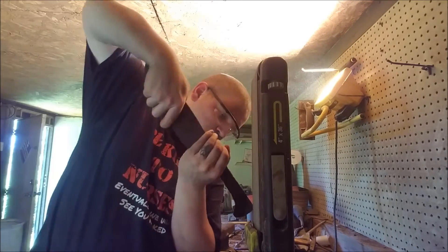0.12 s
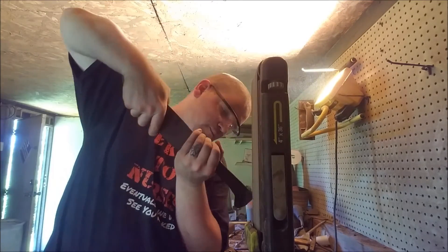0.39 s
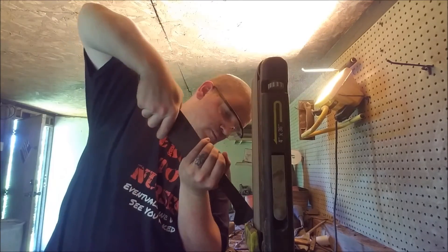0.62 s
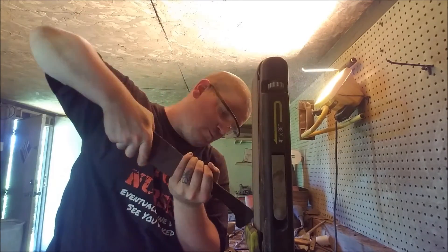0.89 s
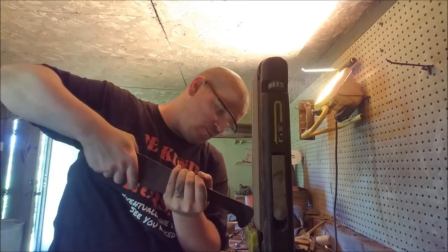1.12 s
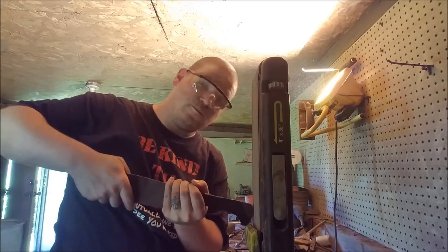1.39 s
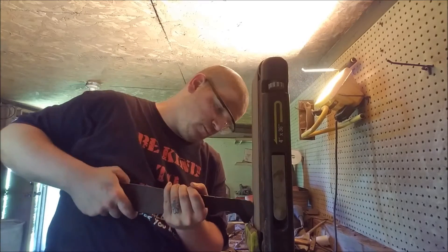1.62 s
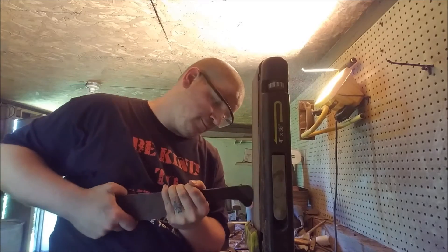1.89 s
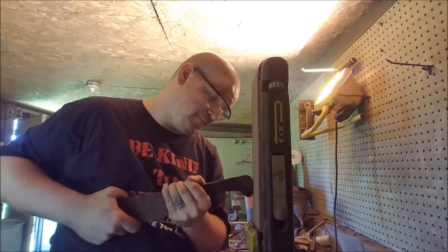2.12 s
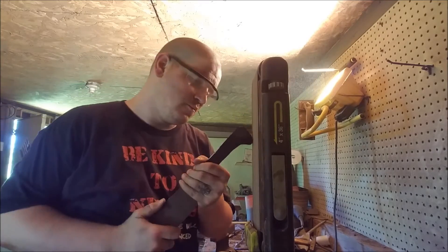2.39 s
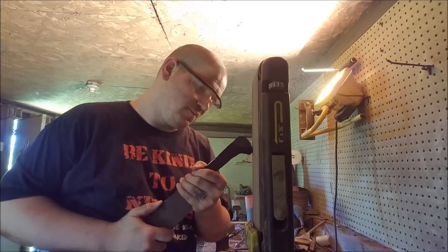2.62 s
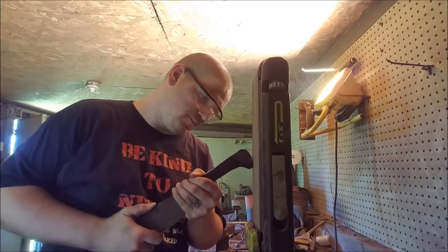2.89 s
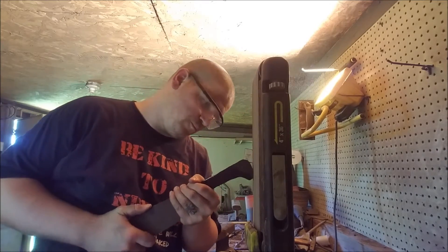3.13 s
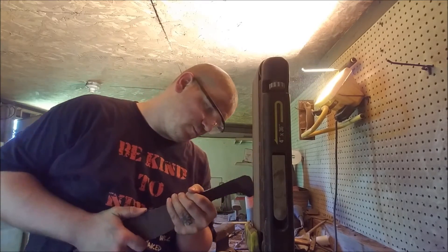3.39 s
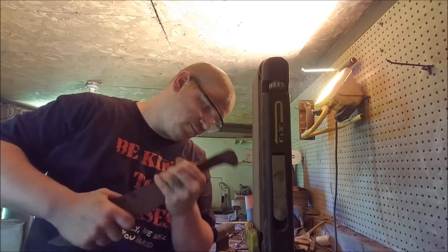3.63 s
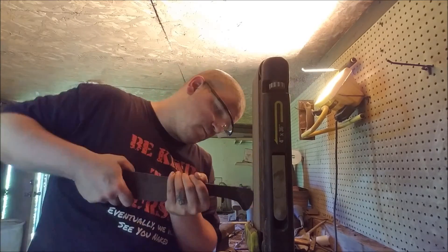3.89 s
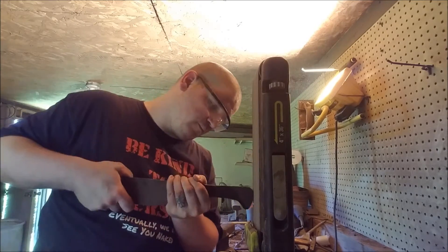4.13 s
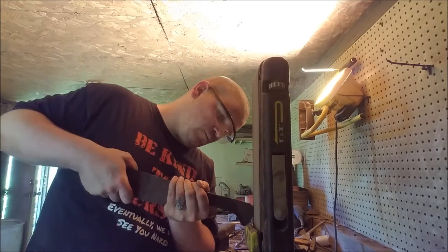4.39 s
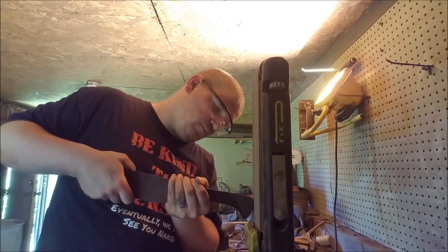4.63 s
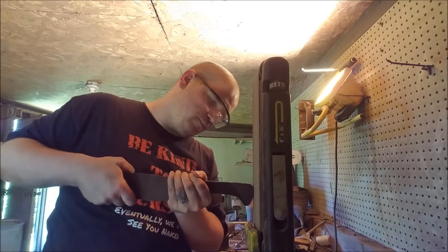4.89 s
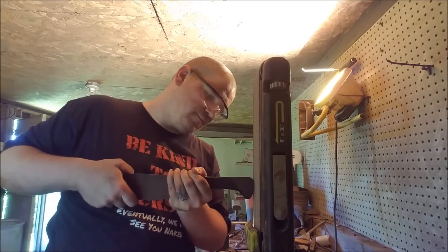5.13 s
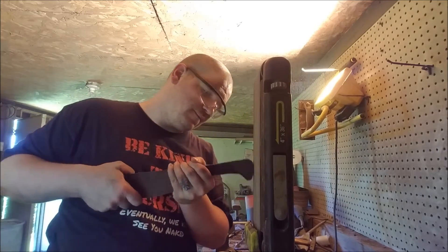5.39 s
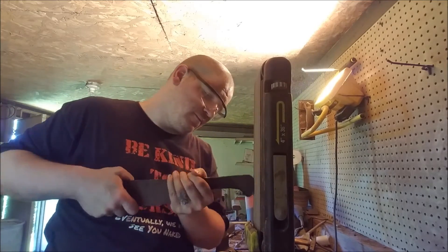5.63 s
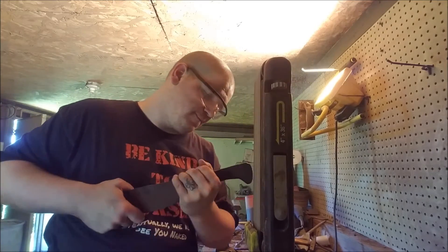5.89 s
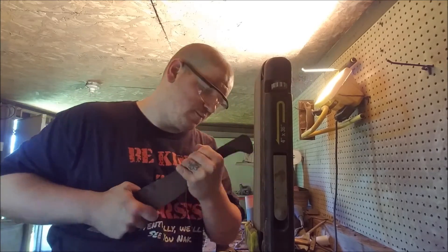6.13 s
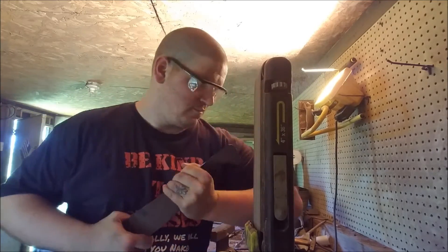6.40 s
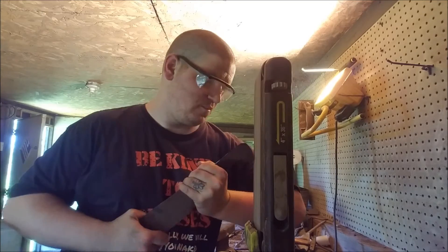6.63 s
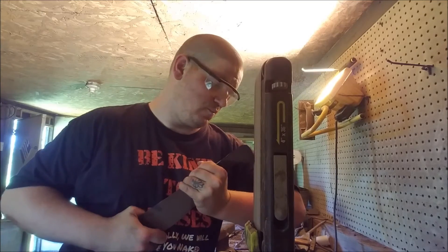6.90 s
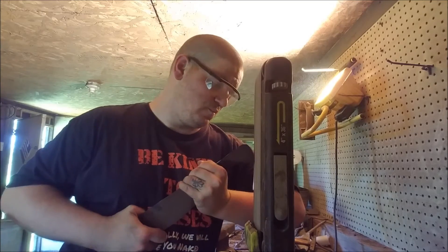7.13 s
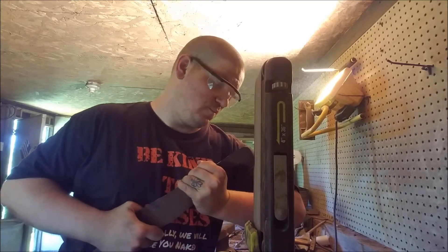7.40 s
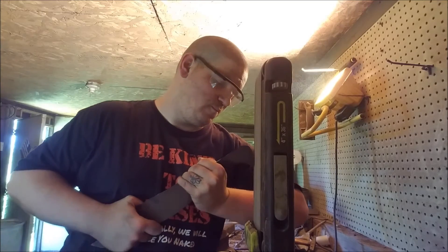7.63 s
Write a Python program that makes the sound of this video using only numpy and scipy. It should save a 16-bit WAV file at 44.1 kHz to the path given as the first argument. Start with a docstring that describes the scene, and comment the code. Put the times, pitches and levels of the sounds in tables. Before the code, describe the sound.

Close stereo pickup in a small, dry workshop: a belt grinder runs throughout with low hum, a steady high whine and a throbbing broadband roar. A steel blade touches briefly, then grinds hard in a long stroke, then lighter and in further passes with little bounces. Each contact brings gritty hiss, sizzle and metallic ringing; the motor sags, then swells back when the blade lifts.

```python
"""Blade on a belt grinder

A belt grinder runs in a small workshop while a steel blade is drawn across the belt in strokes.
The motor's hum and whine are sums of sines; the belt's roar is shaped noise that throbs with the wheel.
Grit tears at the steel as random grains and noise, and the blade rings through a bank of resonances.
Load slows the motor; the recorder's gain control lets the machine swell soon after the blade lifts."""
import sys
import numpy as np
from scipy import signal
from scipy.fft import rfft, irfft
from scipy.io import wavfile
from scipy.ndimage import minimum_filter1d

SR = 44100
rng = np.random.default_rng(int(sys.argv[2]) if len(sys.argv) > 2 else 0)


def output_pcm(signal):
    """Save a mono or channel-first signal as 16-bit PCM at the path in sys.argv[1].

    Samples are clipped to [-1, 1] before scaling.
    """
    pcm = np.clip(np.atleast_2d(signal).T, -1, 1) * 32767
    wavfile.write(sys.argv[1], SR, np.round(pcm).astype(np.int16))


def makeup_ratio(level_db):
    """Linear amplitude ratio for a level in decibels (20 dB per factor of ten)."""
    decades = np.asarray(level_db, float) / 20
    return 10 ** decades


N = 342216   # samples


def rms_one(x):
    """Normalisation: scales a signal to unit root mean square."""
    return x / np.sqrt(np.mean(x ** 2) + 1e-20)


def in_time(rows):
    """Linear interpolation: reads the columns of a table at every sample, its first column being t/s."""
    s, *columns = np.transpose(rows)
    return [np.interp(np.arange(N) / SR, s, c) for c in columns]


def lagged(x, seconds, rate=SR):
    """First-order lag: exponential smoothing, run in on the first value."""
    r = np.exp(-1 / (seconds * rate))
    return signal.lfilter([1 - r], [1, -r], x, zi=[r * x[0]])[0]


def drift(corner_hz):
    """Low-passed chance: noise at SR / 20 through two equal one-pole filters, scaled to rms 1."""
    r = np.exp(-40 * np.pi * corner_hz / SR)
    slow = signal.lfilter([1], [1, -2 * r, r * r], rng.standard_normal(N // 20 + 4002))[4000:]
    return np.interp(np.arange(N) / 20, np.arange(len(slow)), rms_one(slow))


def on_grid(points):
    """Logarithmic frequency scale: reads (f/Hz, value) points at every FFT bin."""
    hz = np.maximum(np.fft.rfftfreq(N, 1 / SR), 1)
    f, value = np.transpose(points)
    return np.interp(np.log(hz), np.log(f), value)


def closed(spectrum):
    """Band limitation: gain per FFT bin, sloping down to -60 dB beyond the ends of the table."""
    ends_low, ends_high = (spectrum[0][0] / 2, -60), (SR / 2, -60)
    return makeup_ratio(on_grid([ends_low] + list(spectrum) + [ends_high]))


# phase by which the left port leads the right: f/Hz, lead/rad
PORT_LEAD_PHASE = [(300, 0.24), (2500, 0.36), (3000, 1), (4200, 1.17), (5200, 1.5), (6000, 0.31),
                   (7400, 2.54), (8300, 2.5), (9000, 2.2), (10000, 0.91), (11000, 2.9), (16000, 3.9)]


def late(x):
    """Diffraction: sound bends round the casing and reaches the right port a little after the left."""
    return np.array([x, irfft(rfft(x) * np.exp(-1j * on_grid(PORT_LEAD_PHASE)), N)])


# share of the broad noise common to both ports: f/Hz, share (0-1)
PORT_LIKENESS = [(60, 0.46), (200, 1), (500, 0.47), (1300, 0.81), (2200, 0.48), (4000, 0.28), (8000, 0.093),
                 (14000, 0.39)]


def port_likeness():
    """Spatial coherence: the share of power common to both ports, per FFT bin."""
    return on_grid(PORT_LIKENESS)


def at_ports(source, spectrum, alike):
    """Direct and reverberant field: a part shared by both ports, and reflections that differ in each."""
    walls_t60_s, far_share = 0.099, 0.14
    t = np.arange(SR // 10) / SR
    echoes = rng.standard_normal((2, len(t))) * makeup_ratio(-60 * t / walls_t60_s)
    echoes = rfft(echoes / np.linalg.norm(echoes, axis=1, keepdims=True), N)
    diffuse = rfft(rng.standard_normal((2, N)))   # far walls smear the sound into unrelated noise
    reflected = np.sqrt(1 - far_share) * echoes * rfft(source) + np.sqrt(far_share) * diffuse
    mixed = np.sqrt(alike) * rfft(late(source)) + np.sqrt(1 - alike) * reflected
    return rms_one(irfft(mixed * spectrum, N))


def panned(x, left_db):
    """Intensity stereo: the left is raised by half of left_db and the right lowered by half."""
    return x * makeup_ratio(np.outer([.5, -.5], left_db * np.ones(N)))


# one list per stroke of the blade: t/s, pressure level/dB, place/blade length, drag as loss of whine f/Hz
STROKE_PATHS = [
    [(0.077, -16, -0.03, 4.5), (0.21, -12, -0.06, 13.7), (0.28, -9.5, 0.0065, 14.3),
     (0.35, -11.5, 0.035, 12.6)],
    [(0.52, -12.5, 0.19, 3), (0.63, -6.5, 0.035, 19), (0.81, -5.5, 0.35, 23.2), (1.14, -6.5, 0.38, 29),
     (1.33, -5.5, 0.53, 20.8), (1.44, -8.5, 0.7, 15.5), (1.76, -8.5, 0.65, 19.1), (1.99, -11.5, 0.79, 13.5),
     (2.18, -15, 1.25, 9.2)],
    [(2.425, -18.5, 0.27, 4.3), (2.51, -19, 0.54, 8.9), (2.78, -18.5, 1, 12.1), (2.85, -19.5, 1.15, 10.3),
     (2.9, -16.5, 1.16, 10.9), (3.12, -15, 1.23, 13.4), (3.38, -12, 1.2, 12.7), (3.52, -10.5, 0.72, 10.5)],
    [(4.045, -22.5, 0.92, 3.2), (4.16, -18, 0.82, 6.7), (4.3, -11.5, 0.43, 9.2), (4.58, -12, 0.73, 19.2),
     (4.69, -11, 0.76, 22.7), (5.1, -12, 1.15, 29), (5.19, -10.5, 1.1, 16.6), (5.502, -13, 0.94, 19.2)],
    [(5.6, -18.5, 0.93, 2.94), (5.68, -18.5, 1.16, 3.07), (5.755, -16, 1.14, 3.3)],
    [(6.0, -12.5, 0.83, 5.7), (6.085, -14, 1.17, 5.5)],
    [(6.667, -16, 0.73, 5.6), (6.74, -19.5, 1, 7.8), (6.85, -23.5, 1, 7.2), (7.02, -20.5, 0.89, 9.1),
     (7.11, -22, 1, 9.9), (7.26, -21.5, 0.96, 8.1), (7.53, -19.5, 1, 12.5), (7.66, -18.5, 0.87, 6.2),
     (7.76, -20.5, 1, 3.8)],
]
# the blade bounces on the belt: t/s, duration/s, pressure level/dB
BELT_BOUNCES = [(2.193, 0.013, -17.5), (3.543, 0.021, -12), (3.914, 0.062, -18.5), (3.985, .06, -23.5),
                (5.521, 0.021, -11.5), (5.77, 0.017, -16.5), (5.79, 0.11, -24), (6.102, 0.017, -13.5)]


def contact():
    """Intermittent contact: returns its on-off state, pressure, place and drag at every sample."""
    bounce_place = 0.81
    touches = list(STROKE_PATHS)
    for s, length, db in BELT_BOUNCES:
        touches.append([(s, db, bounce_place, 0), (s + length, db, bounce_place, 0)])
    on, t = np.zeros(N), np.arange(N) / SR
    for touch in touches:
        on[(t >= touch[0][0]) & (t <= touch[-1][0])] = 1
    rows = sorted(tuple(row) for touch in touches for row in touch)
    return on, *in_time(rows)


# the hands lean the blade towards its edge (positive) or its flat (negative): t/s, lean
BLADE_LEAN = [(.08, 0.07), (.24, -0.38), (.55, -0.48), (.72, -0.18), (1.1, -0.53), (1.5, -0.37),
              (2.15, -0.055), (2.45, 2), (2.62, 0.82), (2.75, -0.13), (3.35, -0.72), (3.52, 0.11),
              (4.4, 0.079), (4.65, -0.33), (5.3, -0.1), (5.52, 0.45), (5.75, -0.38), (6.05, 0.64),
              (6.7, .8), (6.95, 0.49), (7.3, 0.022), (7.76, 0.29)]


def fed(place, db, swing_db, waves, best, lean_db=0):
    """Position-dependent excitation: gain follows a wave along the blade, shifted by the lean."""
    wave = np.cos(2 * np.pi * waves * (place - best))
    return makeup_ratio(db + swing_db * wave + lean_db * in_time(BLADE_LEAN)[0])


def load_shake():
    """Forced vibration: how hard the pressed blade shakes belt and frame."""
    on, pressure_db, place, _ = contact()
    return lagged(on, 0.0063) * makeup_ratio(pressure_db) * fed(place, db=-14, swing_db=9, waves=0.52, best=0.98)


def drag_hz():
    """Rotor inertia: the loss of whine frequency follows the drag with a lag."""
    on, _, _, drag = contact()
    return lagged(on * drag, seconds=.03)


FREE_WHINE_HZ, WHINE_PER_TURN = 1260, 31.4   # unloaded whine; whine cycles per turn of the wheel


def wheel_turns():
    """Integrated speed: turns of the drive wheel since the start."""
    return np.cumsum((FREE_WHINE_HZ - drag_hz()) / WHINE_PER_TURN) / SR


def wheel_throb(depth):
    """Eccentric rotation: a slightly out-of-round wheel presses the belt harder once per turn."""
    angle = 2 * np.pi * wheel_turns()
    return 1 + depth * sum(np.cos(k * (angle + 0.317 * k)) for k in range(1, 12)) / 3


def per_turn(fresh, share, memory):
    """Cyclic repetition: the wheel's surface pattern comes round again, slowly changing, in fresh noise."""
    turns, size = wheel_turns(), 1100   # pattern points per turn
    chance = rng.standard_normal((int(turns[-1]) + 21, size))
    pattern = signal.lfilter([1], [1, -memory], chance, axis=0)[20:]   # one row per turn
    repeated = pattern.ravel()[(turns * size).astype(int)]
    return np.sqrt(share) * rms_one(repeated) + np.sqrt(1 - share) * rms_one(fresh)


# how much of the rasp returns with each turn of the wheel: t/s, share (0-1)
TURN_REPEAT = [(0, 0.06), (.6, 0.57), (1.15, 1), (1.5, 0.27), (2.8, 0.29), (4.3, 0.05), (4.85, 1),
               (5.2, 0.36), (7.76, 0.13)]


def repeat_share():
    """Periodicity: the share of the rasp that returns each turn, which also scales the frame's tones."""
    return in_time(TURN_REPEAT)[0]


def tone(hz, waver_db):
    """Phase accumulation: a sine whose level wavers about rms 1 with a spread of waver_db."""
    phase = 2 * np.pi * np.cumsum(hz * np.ones(N)) / SR + rng.uniform(0, 2 * np.pi)
    return np.sqrt(2) * np.sin(phase) * makeup_ratio(waver_db * drift(10.2))


# steady tones of the hum: f/Hz, level/dB re hum
HUM_TONES = [(101, -21.5), (189, -11), (238, 0.5), (480, -7), (1910, -4.5)]


def hum():
    """Magnetic excitation: mains hum as a sum of steady partials."""
    return makeup_ratio(-35.5) * sum(makeup_ratio(db) * tone(hz, waver_db=.4) for hz, db in HUM_TONES)


# orders of the drive wheel in the frame: multiple of the turning rate, level/dB re frame
WHEEL_ORDERS = [(7, -15.5), (8, -35), (10, -11), (14, -11), (17, -8.5), (18, -13.5)]


def frame():
    """Rotational orders: multiples of the wheel's rate sound in the frame as the blade loads it."""
    turn_hz = (FREE_WHINE_HZ - drag_hz()) / WHINE_PER_TURN
    orders = sum(makeup_ratio(db) * tone(k * turn_hz, waver_db=2.0) for k, db in WHEEL_ORDERS)
    return makeup_ratio(-10.5) * orders * load_shake() * repeat_share()


# swelling and fading of the whine: t/s, level/dB
WHINE_LEVEL = [(0, 8.5), (.25, -8.5), (.37, 6), (.53, 4.5), (.62, 2), (1.2, 6), (1.35, 0), (2.2, 2),
               (2.75, -1.5), (2.95, -5.5), (3.4, 4), (4.2, -0.5), (4.6, -6.5), (5.15, -4.5), (5.35, 5),
               (5.95, -6.5), (6.15, 1), (6.32, -1), (6.39, -12), (6.41, 2.5), (6.64, 1.5), (6.69, -2),
               (7.2, -2.5), (7.76, -9.5)]


def whine():
    """Slot modulation: the rotor-slot whine has side tones one magnetic pull above and below."""
    drag, pull_hz = drag_hz(), 239
    whine_hz = FREE_WHINE_HZ - drag
    tones = tone(whine_hz, waver_db=.6 + 0.11 * drag)   # drag unsteadies the whine
    tones += makeup_ratio(-18.5) * tone(whine_hz - pull_hz, waver_db=5.0)
    tones += makeup_ratio(-26.0) * tone(whine_hz + pull_hz, waver_db=5.0)
    loss_db = 0.13 * drag
    return makeup_ratio(-24 - loss_db + in_time(WHINE_LEVEL)[0]) * tones


def motor():
    """Superposition: hum, frame tones and whine reach both ports from one side."""
    return late(hum() + frame() + whine())


# spectrum of the belt's roar: f/Hz, relative level/dB per Hz
ROAR_SPECTRUM = [(40, -38), (90, -21), (150, -26.5), (230, -12.5), (285, -7), (335, -17), (430, -12),
                 (560, -17), (1150, -10), (1450, -10), (1720, -17.5), (2450, -2.5), (3100, -9),
                 (4050, -2.5), (4900, -16), (6200, -11.5), (7200, -12.5), (8000, -7), (9500, -17),
                 (12500, -17), (16000, -24)]


def belt_roar():
    """Broadband noise: belt, wheels, bearings and fan throb with the wheel and grow under load."""
    source = per_turn(rng.standard_normal(N), share=0.16, memory=0.967)
    noise = at_ports(source, closed(ROAR_SPECTRUM), port_likeness())
    upper = signal.sosfilt(signal.butter(2, 360, "high", fs=SR, output="sos"), noise)
    roar = makeup_ratio(-20.5) * noise + load_shake() * upper
    return roar * makeup_ratio(.5 * drift(8)) * wheel_throb(depth=0.095)


def grit(per_s, spread_db):
    """Random impacts: grains of uneven size strike the steel at random moments."""
    sizes = makeup_ratio(spread_db * np.minimum(rng.exponential(1, N), 5)) * rng.choice([-1, 1], N)
    return sizes * (rng.random(N) < per_s / SR)


# spectrum of the hiss: f/Hz, relative level/dB per Hz
HISS_SPECTRUM = [(4300, -63), (4900, -27), (5400, -9), (6000, -5), (6800, 5), (7300, -0.5), (8300, 6),
                 (9200, 0), (10000, -5), (10600, -62)]


def hiss(fine, place):
    """Band-shaped impact noise: fine grit hisses in the treble."""
    gain = fed(place, db=-3.5, swing_db=3, waves=0.73, best=1.3, lean_db=2)
    return gain * at_ports(fine, closed(HISS_SPECTRUM), port_likeness())


# spectrum of the sizzle: f/Hz, relative level/dB per Hz
SIZZLE_SPECTRUM = [(9600, -41), (10300, 0), (11500, 0.5), (12600, -1), (13700, -10), (14800, -1),
                   (16000, -10.5)]


def sizzle(fine, place):
    """Band-shaped impact noise: the same fine grit sizzles in the top octave, a little to the left."""
    gain = fed(place, db=-6, swing_db=0, waves=1.4, best=-0.14, lean_db=4.5)
    return panned(gain * at_ports(fine, closed(SIZZLE_SPECTRUM), port_likeness()), left_db=1)


# spectrum of the body of the grinding: f/Hz, relative level/dB per Hz
BODY_SPECTRUM = [(900, -24), (1500, -7.5), (1800, -20), (1950, 2), (2700, -4.5), (3500, 1), (4200, -7.5),
                 (4650, -13), (4900, 0.5), (5300, -17)]


def body(place):
    """Band-shaped impact noise: sparser, more even grains fill the middle range."""
    grains = per_turn(grit(per_s=9000, spread_db=0.5), repeat_share(), memory=0.843)
    gain = fed(place, db=-6.5, swing_db=2.5, waves=1.1, best=-2.5, lean_db=-4.5)
    return gain * at_ports(grains, closed(BODY_SPECTRUM), port_likeness())


# modes of the blade, fed unevenly along its length: f/Hz, width of each filter section/Hz,
# level/dB re pressure, swing/dB, waves per blade length, best-fed place/blade length, dB per unit of lean
BLADE_MODES = [(1988, 196, -17, 0, 0.94, 0.91, -4.5), (2354, 170, -14.5, 1.5, 1.15, 0.64, 3),
               (2487, 220, -16.5, 0.5, .5, .9, -1), (2857, 73, -17, 3.5, 0.97, .02, -14),
               (3000, 65, -13.5, 5.5, 0.58, 1.04, -7.5), (3300, 120, -18, 9.5, .94, 0.6, 1),
               (3757, 140, -19.5, 7.5, 0.92, 0.39, -16.5), (4175, 106, -18.5, 14, 0.47, 1.24, -0.5),
               (4310, 695, -11, 13.5, .28, 1.646, 6), (5140, 450, -22.5, 5, 0.56, .8, 10),
               (5944, 110, -19, 3, 0.44, 0.57, 5.5), (8040, 480, -15.5, 12.5, 0.44, 0.37, 2),
               (8870, 760, -16, 9, .54, 0.47, -5), (9660, 227, -15.5, 7, 0.47, 1.08, 2)]


def blade(rasp, place):
    """Modal resonance: the rasp feeds each mode through a doubled filter, so hollows between stay dark."""
    out = 0
    for hz, width_hz, *feed in BLADE_MODES:
        r, w = np.exp(-np.pi * width_hz / SR), 2 * np.pi * hz / SR
        section = [(1 - r * r) / 2, 0, (r * r - 1) / 2, 1, -2 * r * np.cos(w), r * r]
        drive = rasp * fed(place, *feed) * makeup_ratio(0.25 * drift(15))
        ring = signal.sosfilt([section, section], drive)
        out = out + 2 * ring / np.sqrt(1 - r * r)   # evens out power between widths
    return out


def grinding():
    """Common modulation: all layers share the hand's pressure and chatter and the wheel's throb."""
    on, pressure_db, place, _ = contact()
    chatter_db = 0.52 * drift(33) + 1.17 * drift(190)
    force = lagged(on, 0.00074) * wheel_throb(depth=0.2) * makeup_ratio(pressure_db + chatter_db)
    fine = per_turn(grit(per_s=14000, spread_db=4.0), 0.18 * repeat_share(), memory=0.5)
    rasp = at_ports(per_turn(rng.standard_normal(N), repeat_share(), memory=0.8), 1, alike=0.78)
    ring = panned(blade(force * rasp, place), left_db=-0.2 + 2 * place)   # moves left towards the tip
    return force * (hiss(fine, place) + sizzle(fine, place) + body(place)) + ring


def scene():
    """Superposition: motor, belt and grinding sound together."""
    return motor() + belt_roar() + grinding()


def gain_control(x):
    """Dynamic compression: follows loudness slightly ahead, holds peaks, then lets the gain up quickly."""
    target_db, squeeze, most_gain_db = -15, 0.86, 5.5
    sense_s, hold_s, release_db_per_s, glide_s, look_ahead_s = .015, .11, 144, 0.021, 0.0065
    rate = SR / 32   # control steps per second
    power = np.mean(x ** 2, axis=0)
    power[0] = power[:SR // 20].mean()   # starts the smoothing near the usual level
    level_db = 10 * np.log10(lagged(power, sense_s)[::32] + 1e-12)
    half = int(hold_s * rate / 2)
    run_in = np.r_[np.full(half, level_db[0]), level_db]
    held = -minimum_filter1d(-run_in, size=2 * half + 1)[:len(level_db)]   # highest level of late
    fall = release_db_per_s * np.arange(len(held)) / rate
    held = np.maximum.accumulate(held + fall) - fall
    wanted_db = np.minimum(squeeze * (target_db - held), most_gain_db)
    gain_db = np.minimum(wanted_db, lagged(wanted_db, glide_s, rate))   # down at once, up in a glide
    steps = (np.arange(N) / SR + look_ahead_s) * rate
    return x * makeup_ratio(np.interp(steps, np.arange(len(gain_db)), gain_db))


def top_cut(x):
    """Nothing passes above the cut-off."""
    return signal.sosfilt(signal.butter(12, 16920, fs=SR, output="sos"), x)


def record(dry):
    """Saturation and band limits: after gain control peaks are rounded, deep bass and top are cut."""
    rounded = np.tanh(gain_control(dry) / 1.198) * 1.391
    thin = signal.sosfilt(signal.butter(3, 70, "high", fs=SR, output="sos"), rounded)
    thin = signal.sosfilt(signal.ellip(12, .5, 70, 15800, fs=SR, output="sos"), thin)
    return top_cut(np.clip(thin, -1, 1))


dry = scene()
out = record(dry)
output_pcm(out)
```